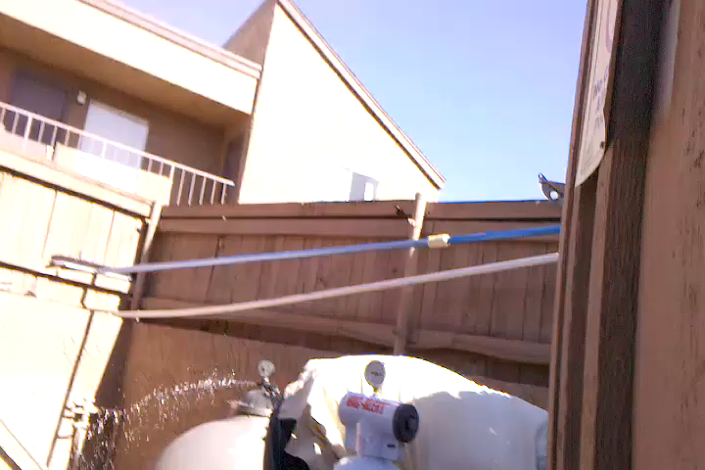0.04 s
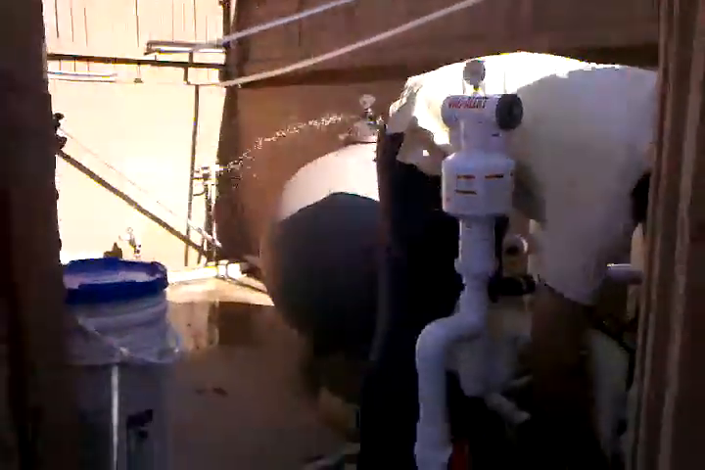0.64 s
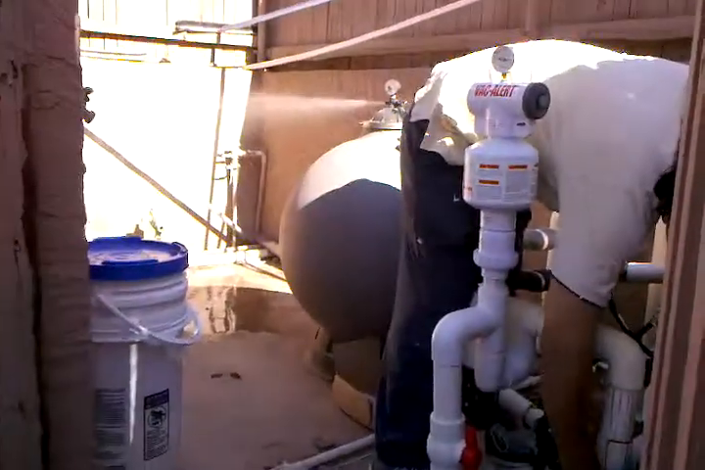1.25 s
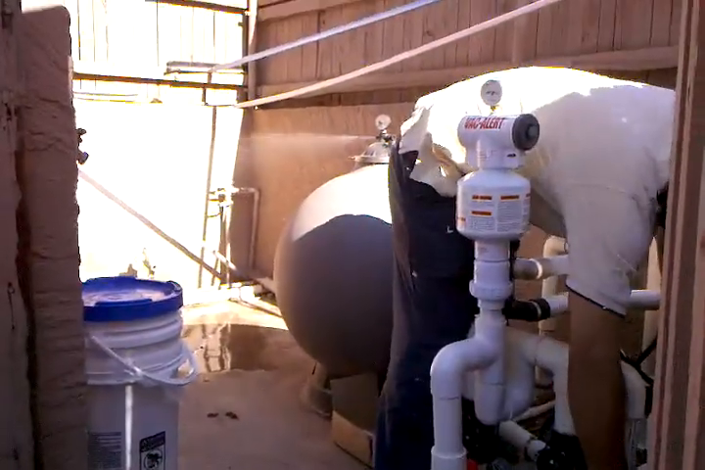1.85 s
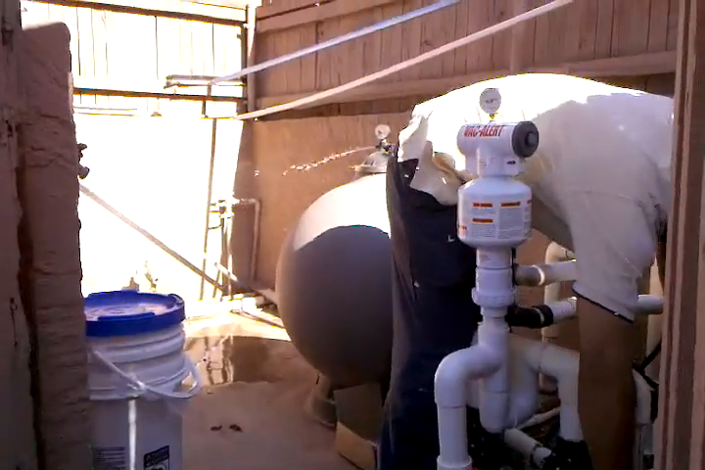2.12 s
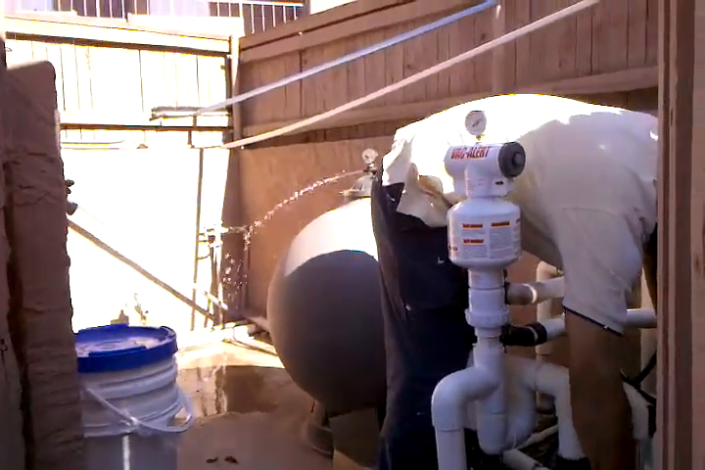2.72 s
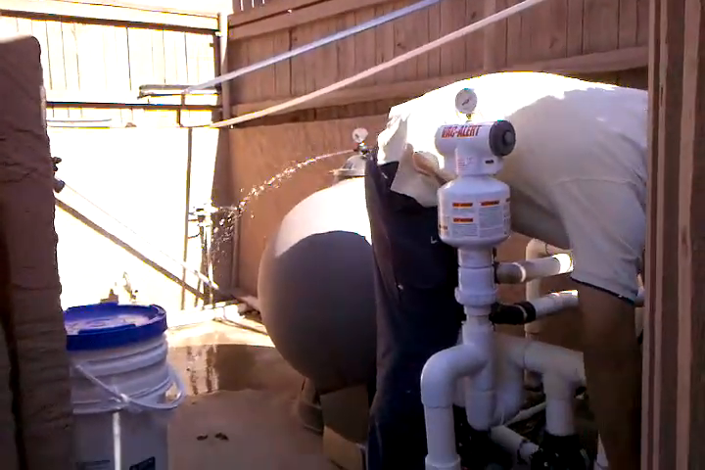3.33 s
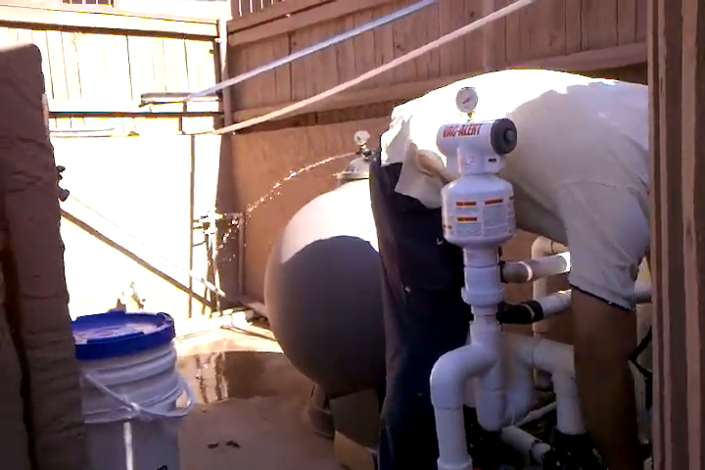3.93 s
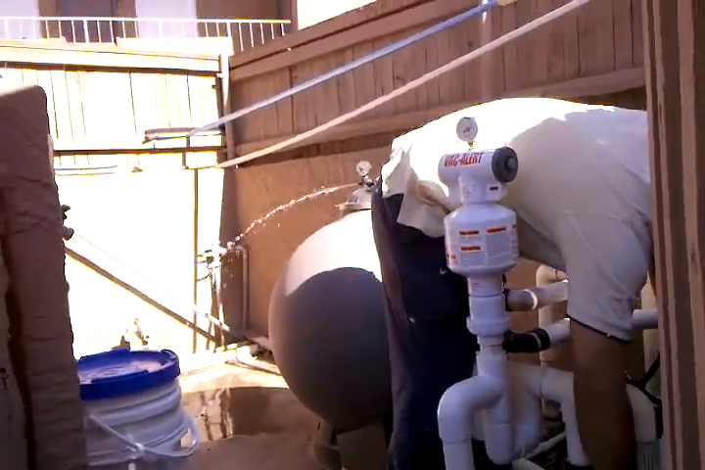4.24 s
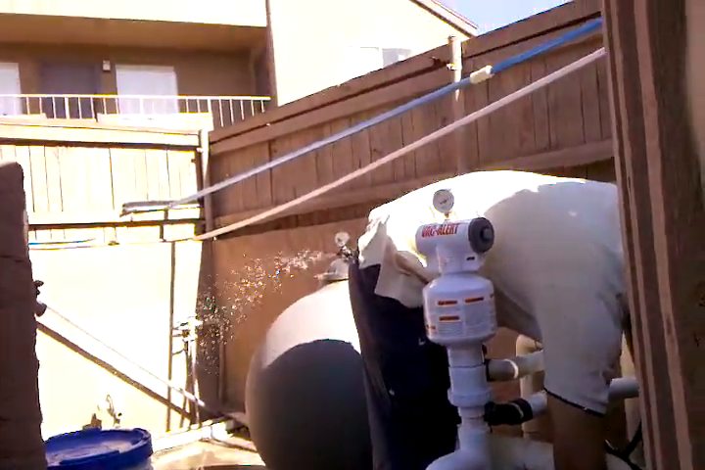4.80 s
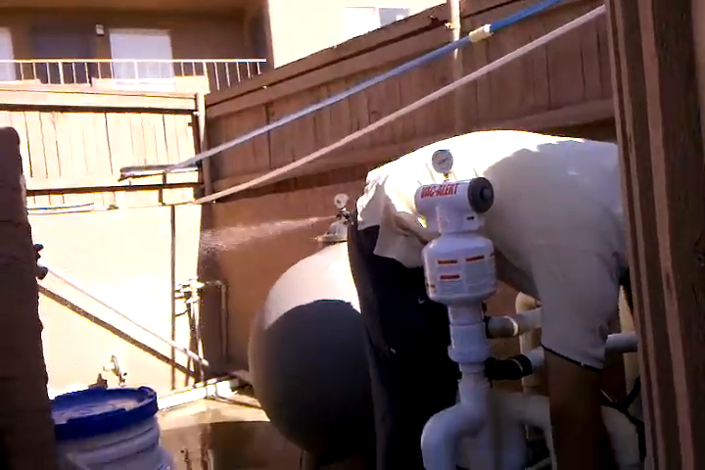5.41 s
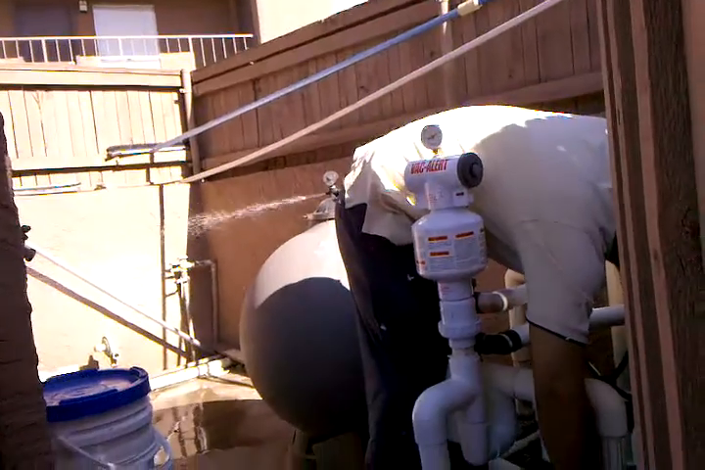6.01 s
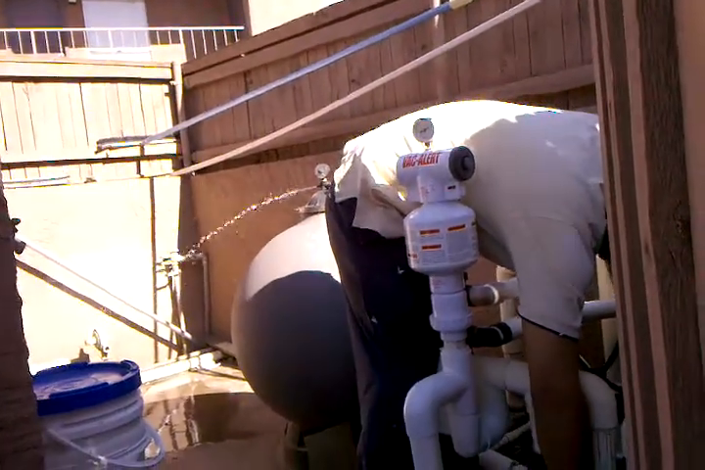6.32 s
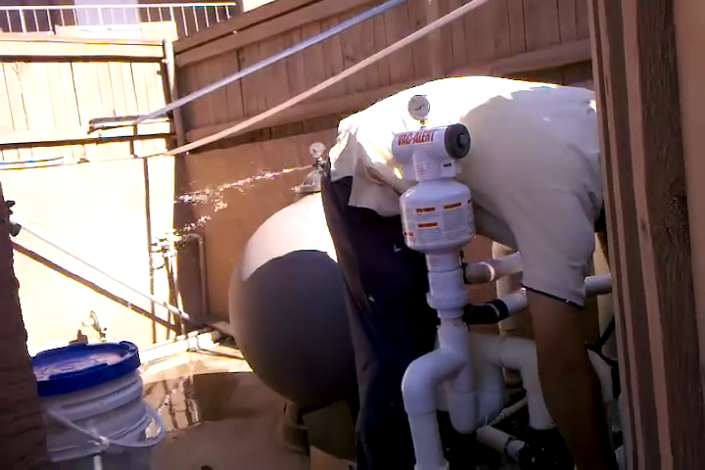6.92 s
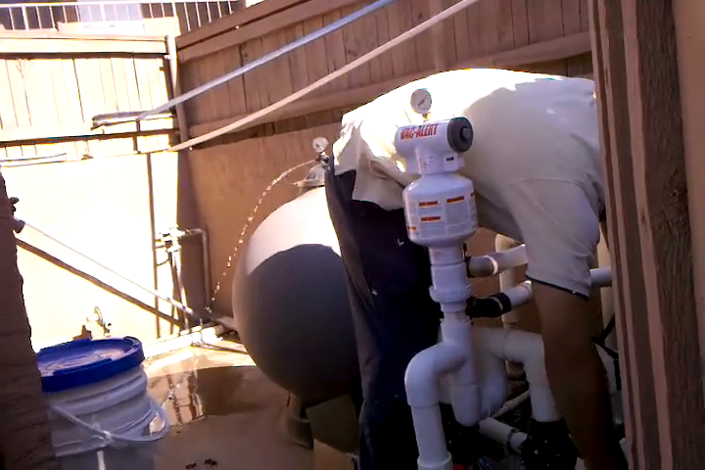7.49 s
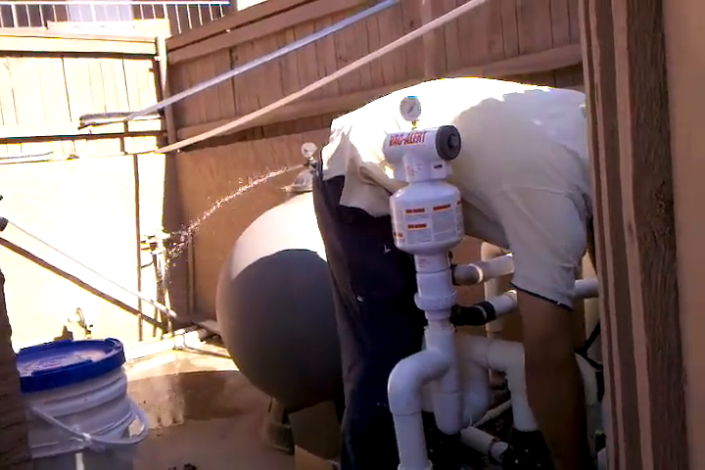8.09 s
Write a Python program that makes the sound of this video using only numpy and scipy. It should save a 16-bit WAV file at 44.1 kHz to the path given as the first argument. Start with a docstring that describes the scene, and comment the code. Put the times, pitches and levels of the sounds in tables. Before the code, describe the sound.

In a fenced yard, a few steps away, air and water hiss from the bleed valve of a pool filter tank. Slugs of water drum on the fence and the jet flutters into a short buzz. A thin stream then fizzes and spits, with one close, dry click. More hissing bursts follow, then a second buzz and more fizzing. Underneath, the pump hums, churns and drones.

```python
"""Trapped air hisses in bursts from the open bleed valve on a pool pump's filter tank, in a fenced yard. Where
water reaches the valve, the jet flutters into a buzz; between bursts a thin stream fizzes and spits. Slugs of
water drum on the fence over low puffs of air, and one sharp dry click sounds. Underneath, the pump hums, churns
louder as it takes up water and drones when it draws air."""
import sys
import numpy as np
from scipy import signal
from scipy.fft import rfft, irfft, next_fast_len
from scipy.io import wavfile

SR = 44100
rng = np.random.default_rng(int(sys.argv[2]) if len(sys.argv) > 2 else 0)


def unload_audio(sound):
    """Save the sound as a 16-bit wav file, at the path given as the first command line argument."""
    columns = np.transpose(np.atleast_2d(sound))
    # keep every value between -1 and 1, then stretch to whole-number steps
    steps = np.round(np.clip(columns, -1, 1) * 32767)
    wavfile.write(sys.argv[1], SR, steps.astype(np.int16))


N = 359415

# bursts of escaping air: (start [s], end [s], level [dB], attack [s], sag [dB/s])
AIR_BURSTS = [(1.062, 2.037, -40, 0.026, 0.5), (4.747, 4.8, -42.5, 0.061, 51),
              (5.26, 5.788, -41, 0.078, -3), (5.925, 6.102, -42.5, 0.17, 5.5),
              (6.982, 7.25, -43, 0.058, 0.5)]
# bright tone of the jet: (frequency [Hz], level [dB])
JET_SPECTRUM = [(400, -11.5), (1000, -6.5), (2000, -8.5), (2750, -12.5), (3400, -4), (4100, 0),
                (4450, -4.5), (4950, 0), (5400, -2), (5800, -5), (6100, -6.5), (6650, -6.5), (7500, -4.5)]

def air_jet(release_s=.16, hiss_db=2, shrill_hz=5380, shrill_db=-7, full_flow_db=-37):
    """Air and mist hiss from the valve, shriller the harder they flow."""
    bursts = sum(envelope(start, end, db, attack, release_s, sag)
                 for start, end, db, attack, sag in AIR_BURSTS)
    flow = bursts * from_db(drift(3.3)) + from_db(-7.5) * slug_surges()
    sputter = from_db(.73 * drift(130))
    hiss = from_db(hiss_db) * coloured(noise() * sputter, JET_SPECTRUM)
    shrill = band(noise() * sputter, shrill_hz, widths_hz=(650, 1300))
    return flow * (hiss + flow * from_db(shrill_db - full_flow_db) * shrill)


# buzzes: (start [s], end [s], level [dB], settled rate [Hz], starting lag [share of rate], top ring [dB])
VALVE_FLUTTERS = [(1.762, 2.064, -38.5, 111, .33, -0.5), (6.982, 7.256, -35, 147, .03, 0)]
# the valve's low and high resonances: (frequency [Hz], width [Hz], level [dB])
VALVE_LOW_MODES = [(910, 240, -1.5), (1463, 140, 4.5), (2320, 330, -4), (3364, 280, 4)]
VALVE_HIGH_MODES = [(4260, 460, 3.5), (5100, 460, -11), (5700, 330, -5), (6720, 300, -6)]

def flutter(start, end, db, settled_hz, lag, top_db, settle_s=.075, release_s=.13, stall_db=9):
    """Water chops the air into puffs that speed up to a steady rate and ring the valve."""
    age = np.arange(N) / SR - start
    running = (age > 0) & (age < end - start + release_s * stall_db / 20)
    rate = settled_hz * (1 - lag * np.exp(-(age / settle_s) ** 2))
    cycles = np.cumsum(running * rate * (1 + .012 * drift(60))) / SR
    swing = np.cos(np.pi * cycles)  # flips with every pulse
    limping = cycles + .07 * (swing - 1) / 2  # long and short gaps alternate
    pulses = np.diff(np.ceil(limping), prepend=0) * from_db(.2 * noise())
    breath = die_away(die_away(pulses, .0005), .0005) * noise()
    drive = rms_one(pulses) + 1.07 * rms_one(breath)
    # pulses favour the low and high modes by turns; slower pulses ring the top less
    low = body(drive * from_db(2 * swing), VALVE_LOW_MODES)
    high = body(drive * from_db(top_db + .1 * (rate - settled_hz) - swing), VALVE_HIGH_MODES)
    buzz = yard(low + high, wet_db=-8, t60=.14)
    gain = envelope(start, end, db, attack_s=.004, release_s=release_s, sag_db_per_s=6)
    return gain * buzz / np.std(buzz[running])


# fader curve of the stream: (time [s], level [dB])
STREAM_LEVELS = [(2.3, -49), (2.99, -52.5), (3.94, -53.5), (4.66, -46), (5.15, -50.5), (7.4, -51),
                 (7.52, -49), (8.15, -54.5)]
# tone of its fizz: (frequency [Hz], level [dB])
STREAM_SPECTRUM = [(1200, -2.5), (2200, -2), (2700, -2.5), (3350, 1), (3800, 0.5), (5000, -0.5),
                   (6000, -3.5), (6800, -4.5), (8000, -1.5)]

def stream(trim_db=1.5, drops_per_s=350, size_db=8, patter_db=-5):
    """A thin stream fizzes at the valve and breaks into drops that patter on the ground."""
    lands = rng.random(N) < drops_per_s * from_db(4 * drift(8)) / SR
    sizes = from_db(size_db * np.minimum(rng.exponential(1, N), 3.5))
    drops = die_away(lands * sizes, .0009) * noise()
    patter = rms_one(yard(drops, wet_db=0, t60=.2))
    fizz = coloured(noise() + from_db(patter_db) * patter, STREAM_SPECTRUM)
    return from_db(trim_db + in_time(STREAM_LEVELS)) * fizz


# the loudest bubbles spat from the valve: (time [s], level [dB], ring [Hz])
BUBBLE_SPITS = [(0.8594, -45, 5030), (2.717, -32, 5110), (3.0749, -30.5, 3460), (3.0984, -37, 3530),
                (3.2191, -33, 3520), (3.272, -31.5, 6000), (3.4445, -39, 5060), (3.5764, -34.5, 4060),
                (3.8832, -26, 5410), (3.976, -34, 3630), (4.5503, -24.5, 5000), (4.5734, -34, 3000),
                (4.649, -32, 4540), (4.9235, -33, 4060), (6.326, -33, 5150), (6.8408, -35, 3660),
                (6.9037, -36, 4810), (7.5976, -31.5, 6340), (7.6872, -30.5, 5210), (7.8251, -37, 5180)]

def spits(trim_db=-7, snap_s=.0008, spray_s=.018, spray_db=-13):
    """A bubble passing the valve snaps at a pitch of its own, then trails a little spray."""
    out, t = np.zeros(N), np.arange(SR // 10) / SR
    decay = np.exp(-t / snap_s) + from_db(spray_db) * np.exp(-t / spray_s)
    mist = coloured(noise(), [(2000, -21), (2800, -8.5), (3500, 0), (7000, -1.5)])
    for time, db, hz in BUBBLE_SPITS:
        span = slice(round(time * SR), round(time * SR) + len(t))
        snap = from_db(db) * decay * mist[span]
        out[span] += snap + resonate(snap, hz, width_hz=1500)
    return from_db(trim_db) * yard(out, wet_db=-7, t60=.22)


# slugs of water thrown against the fence: (time [s], level [dB])
WATER_SLUGS = [(1.129, -43.5), (1.3, -37), (1.46, -33.5)]

def slug_surges():
    """Gain that swells each time the jet carries a slug of water."""
    return sum(envelope(time, time, db, attack_s=.086, release_s=.11) for time, db in WATER_SLUGS)


def spray_on_fence():
    """Slugs of water drum on the boards."""
    return slug_surges() * band(noise(), hz=840, widths_hz=(130, 200))


# low puffs of air: (time [s], level [dB])
AIR_PUFFS = [(1.175, -37), (1.64, -42.5)]

def air_puffs():
    """Soft, low puffs of wind pass through the yard."""
    air = coloured(noise(), [(60, -23), (110, -8), (200, -1), (300, -2), (450, -23)])
    return air * sum(envelope(time, time, db, attack_s=.12, release_s=.19) for time, db in AIR_PUFFS)


# one sharp, dry click: (time [s], level [dB])
DRY_CLICK = (3.4111, -12)

def click(fall_s=.00072):
    """A sharp pressure step that swings back once."""
    time, db = DRY_CLICK
    impulse = np.zeros(N)
    impulse[round(time * SR)] = 1.38 * from_db(db)
    return pass_filter(die_away(impulse, fall_s), "high", hz=130, order=2)


# load on the pump, heard as churning water: (time [s], level [dB])
PUMP_LOAD = [(0.95, -48.5), (1.06, -46.5), (1.65, -44), (2.19, -38), (2.59, -39.5), (2.75, -38.5),
             (3.19, -39.5), (4.13, -39), (4.51, -46.5), (5.76, -44), (6.99, -44.5), (7.03, -40),
             (7.24, -36.5), (8.15, -45)]
# midrange wash of that water: (frequency [Hz], level [dB])
WASH_SPECTRUM = [(40, -44), (90, -20), (150, -13), (280, -5.5), (520, -0.5), (720, 4), (880, -1),
                 (1020, -2.5), (1150, -4.5), (1420, -5), (1900, -7), (2300, -15.5), (2800, -21),
                 (5000, -30)]
# hollow ring of the pipes: (frequency [Hz], width [Hz], level [dB])
PIPE_RINGS = [(380.8, 16, -0.5), (662.2, 7.5, -1.5), (709.3, 13, -3.5), (779, 69, -14), (1003, 56, -10.5),
              (1404, 13, -12), (1693, 21, -14)]

def churning(loaded_db=-38, wash_db=-.25, pipes_db=-.5, bass_db=-20):
    """Water and air tumble through the impeller; under load, pipes and bass grow faster than the wash."""
    load_db = in_time(PUMP_LOAD)
    boom = from_db(.6 * (load_db - loaded_db))
    lumps = from_db(.94 * drift(50))
    wash = from_db(wash_db) * coloured(noise() * lumps, WASH_SPECTRUM)
    pipes = from_db(pipes_db) * coloured(body(noise(), PIPE_RINGS), [(300, .0023), (1800, .0018)])
    bass = from_db(bass_db) * coloured(noise(), [(50, -23), (75, -7), (120, -1), (200, -4)])
    return from_db(load_db) * (wash + boom * (pipes + bass))


# the pump draws air: (start [s], end [s], level [dB])
PUMP_AIRLOCKS = [(1.1, 1.564, -44), (4.954, 6.8, -44.5)]
# dark bed of rumble: (frequency [Hz], level [dB])
RUMBLE_SPECTRUM = [(40, -47.5), (90, -28.5), (150, -12.5), (200, -5.5), (240, -5.5), (295, -5.5), (345, 0),
                   (410, -3.5), (530, 0), (700, -6.5), (900, -14.5), (1700, -17), (3000, -33)]

def pump_housing(drone_hz=346, rumble_rest_db=-46, drone_rest_db=-52):
    """Air in the pump swells its rumble and a narrow housing drone with a breathy undertone."""
    airlock = sum(envelope(*row, attack_s=.22, release_s=.25) for row in PUMP_AIRLOCKS)
    rumble_gain = np.hypot(from_db(rumble_rest_db), from_db(-2) * airlock)
    rumble = rumble_gain * coloured(noise(), RUMBLE_SPECTRUM)
    drone = wavering_tone(drone_hz, drift_hz=6) * from_db(drift(8))
    undertone = from_db(-9.5) * band(noise(), hz=252, widths_hz=(22, 110))
    return rumble + np.hypot(from_db(drone_rest_db), airlock) * (drone + undertone)


# motor and mains tones: (frequency [Hz], level [dB])
HUM_TONES = [(58, -78), (78, -71), (120, -63), (387, -57), (480, -53.5), (679, -60.5), (705, -59)]

def motor_hum(throb_db=3.5, load_share=.19):
    """Motor and mains tones throb, their level gently riding the pump's load."""
    load_db = in_time(PUMP_LOAD)
    tones = sum(from_db(db + throb_db * drift(3.2)) * wavering_tone(hz, drift_hz=5)
                for hz, db in HUM_TONES)
    return from_db(load_share * (load_db - load_db.mean())) * tones


def yard(x, wet_db, t60):
    """Add scattered reflections from fence, wall and ground."""
    t = np.arange(SR // 2) / SR
    echoes = rng.standard_normal(len(t)) * (rng.random(len(t)) < .03)
    echoes *= (t > .003) * from_db(-60 * t / t60)
    return x + from_db(wet_db) * signal.fftconvolve(x, echoes / np.linalg.norm(echoes))[:N]


def envelope(start, end, db, attack_s, release_s, sag_db_per_s=0):
    """Gain that rises, holds from start to end with a sag, and dies; attack and release span 20 dB."""
    t = np.arange(N) / SR
    held_db = db - sag_db_per_s * (np.clip(t, start, end) - start)
    outside = np.maximum(start - t, 0) / attack_s + np.maximum(t - end, 0) / release_s
    return from_db(held_db - 20 * np.minimum(outside, 10))


def from_db(db):
    """Decibels to gain."""
    return 10 ** (np.asarray(db) / 20)


def rms_one(x):
    """Scale to unit power."""
    return x / np.sqrt(np.mean(x ** 2) + 1e-20)


def in_time(rows):
    """Join breakpoints into a curve at every sample."""
    return np.interp(np.arange(N) / SR, *np.transpose(rows))


def noise():
    """White turbulence."""
    return rng.standard_normal(N)


def drift(hz, hop=40):
    """Smooth random motion at unit power."""
    r = np.exp(-2 * np.pi * hz * hop / SR)
    slow = signal.lfilter([1], [1, -2 * r, r * r], rng.standard_normal(N // hop + 2002))[2000:]
    return np.interp(np.arange(N) / hop, np.arange(len(slow)), rms_one(slow))


def wavering_tone(hz, drift_hz, depth=.004):
    """A unit-power sine whose pitch wanders."""
    cycles = hz * np.cumsum(1 + depth * drift(drift_hz)) / SR
    return np.sqrt(2) * np.sin(2 * np.pi * cycles)


def coloured(x, spectrum):
    """EQ by (frequency [Hz], level [dB]) points, rolling off past the ends; unit power."""
    size = next_fast_len(N)
    hz, level_db = np.transpose(spectrum)
    bins = np.maximum(np.fft.rfftfreq(size, 1 / SR), 1)
    skirts = np.minimum(bins / hz[0], 1) ** 2 * np.minimum(hz[-1] / bins, 1) ** 2
    curve = from_db(np.interp(np.log(bins), np.log(hz), level_db))
    return rms_one(irfft(rfft(x, size) * skirts * curve, size)[:N])


def resonate(x, hz, width_hz):
    """One resonance with gain 1 at its peak."""
    r = np.exp(-np.pi * width_hz / SR)
    feedback = [1, -2 * r * np.cos(2 * np.pi * hz / SR), r * r]
    return signal.lfilter(np.array([1, 0, -1]) * (1 - r * r) / 2, feedback, x + 1e-18)


def band(x, hz, widths_hz):
    """Two resonances in series; unit power."""
    return rms_one(resonate(resonate(x, hz, widths_hz[0]), hz, widths_hz[1]))


def body(x, modes):
    """Resonances in parallel, alternating in polarity."""
    return sum((-1) ** k * from_db(db) * resonate(x, hz, width)
               for k, (hz, width, db) in enumerate(modes))


def die_away(clicks, seconds):
    """Each click starts an exponential decay."""
    return signal.lfilter([1], [1, -np.exp(-1 / (seconds * SR))], clicks + 1e-18)


def pass_filter(x, kind, hz, order):
    """A flat high-pass or low-pass."""
    return signal.sosfilt(signal.butter(order, hz, kind, fs=SR, output="sos"), x)


def scene():
    """Valve, water and pump in mono, a few steps away."""
    valve = air_jet() + sum(flutter(*row) for row in VALVE_FLUTTERS)
    spray = spray_on_fence() + air_puffs() + stream() + spits()
    pump = pump_housing() + motor_hum() + churning()
    return (valve + spray + click() + pump)[None]


def record(dry, start_s=.8144, fade_s=.21, fade_db=-12, leak_db=-36):
    """Silence, then a fade-in; deep bass and the top are cut; a faint hiss leaks through up to 9 kHz."""
    t = np.arange(N) / SR
    opening = (t > start_s) * from_db(fade_db * np.clip(1 - (t - start_s) / fade_s, 0, 1))
    lean = pass_filter(dry * opening, "high", hz=45, order=2)
    dull = pass_filter(lean, "low", hz=7000, order=32)
    return pass_filter(dull + from_db(leak_db) * lean, "low", hz=9000, order=32)


dry = scene()
out = record(dry)
unload_audio(out)
```